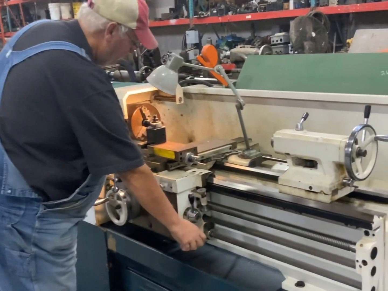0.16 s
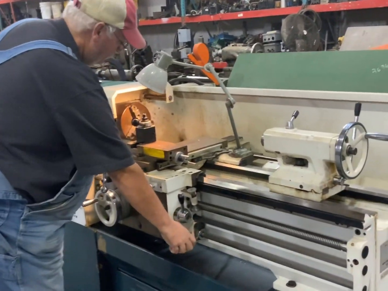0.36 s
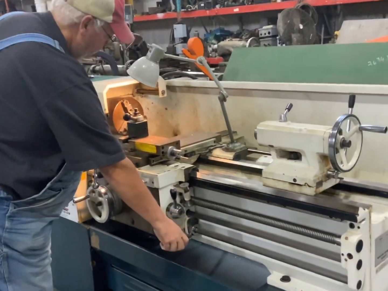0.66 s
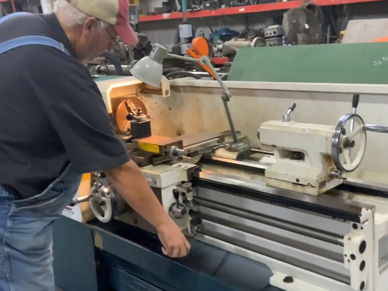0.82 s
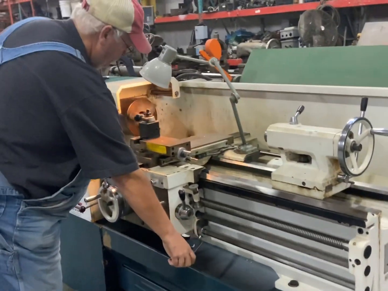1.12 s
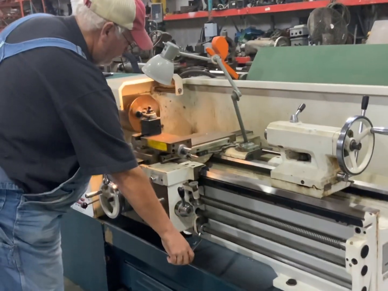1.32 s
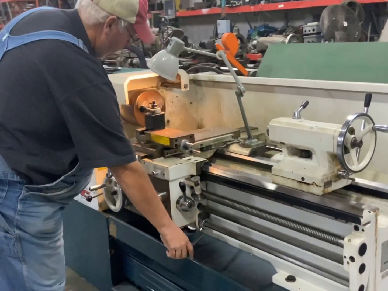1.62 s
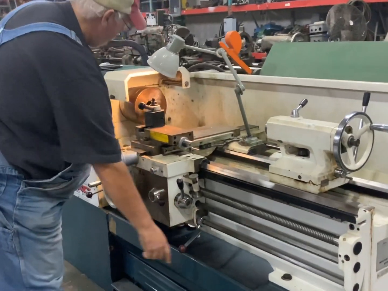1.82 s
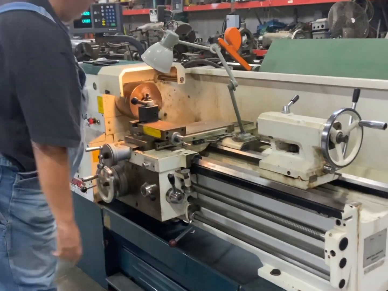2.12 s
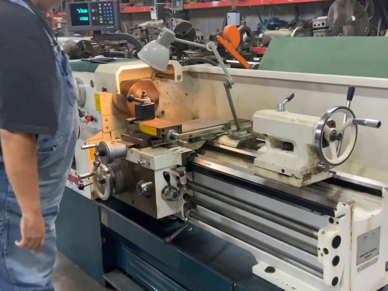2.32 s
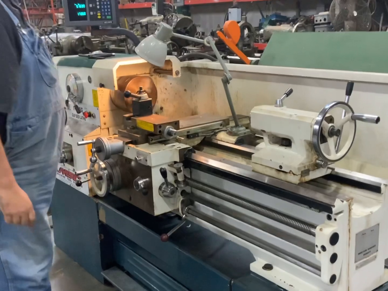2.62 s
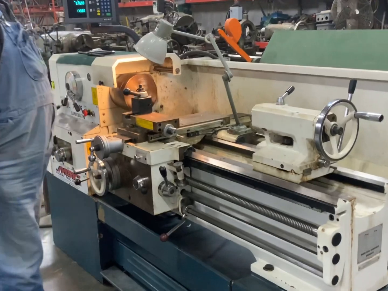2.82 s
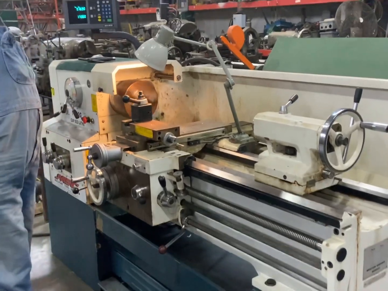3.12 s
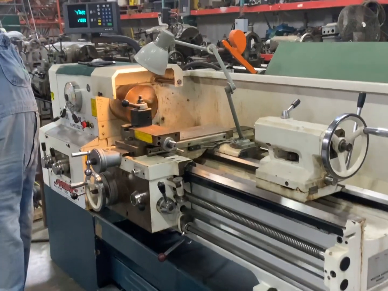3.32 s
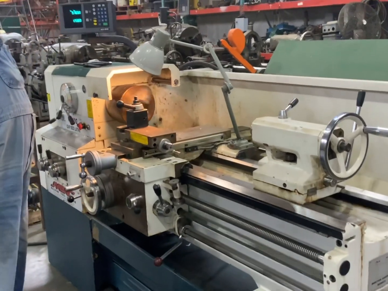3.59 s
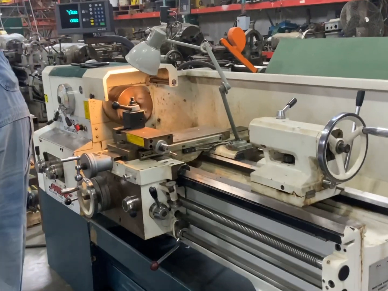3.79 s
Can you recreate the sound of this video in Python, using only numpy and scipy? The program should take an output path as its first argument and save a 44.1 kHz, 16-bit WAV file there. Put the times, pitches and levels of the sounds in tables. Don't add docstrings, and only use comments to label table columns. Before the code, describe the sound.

Metal lathe starting: faint gear hum, a sharp lever snap and heavy chattering bang, then throbbing whine.

```python
import sys
import numpy as np
from scipy import signal
from scipy.fft import rfft, irfft, next_fast_len
from scipy.io import wavfile
from scipy.ndimage import uniform_filter1d, map_coordinates

SR = 44100
rng = np.random.default_rng(int(sys.argv[2]) if len(sys.argv) > 2 else 0)


def master_out(mix):
    frames = np.transpose(np.atleast_2d(mix))
    ceiling = np.clip(frames, -1, 1)
    pcm = np.round(ceiling * 32767).astype(np.int16)
    wavfile.write(sys.argv[1], SR, pcm)


def elevation(decibels):
    levels = np.asarray(decibels, float)
    return 10 ** (levels / 20)


N = 174195
T = np.arange(N) / SR
FFT_SIZE = next_fast_len(N + SR // 2)
F = np.fft.rfftfreq(FFT_SIZE, 1 / SR)
CLUTCH_S, SPIN_UP_S = 0.895, 0.073
SPINDLE_TEETH = 58


def unit(x):
    return x / np.sqrt(np.mean(x ** 2))


def curve(table):
    hz, db = np.array(table).T
    return elevation(np.interp(np.log(F + 1), np.log(hz), db))


def colour(x, table):
    inside = (F >= table[0][0]) * (F < table[-1][0])
    return unit(irfft(rfft(x, FFT_SIZE) * curve(table) * inside, FFT_SIZE)[:N])


def noise(table):
    return colour(rng.standard_normal(N), table)


def walk(rate_hz):
    k = int(SR / rate_hz)
    steps = np.repeat(rng.standard_normal(N // k + 1), k)
    return unit(uniform_filter1d(uniform_filter1d(steps, k), k)[:N])


def ring(x, hz, width_hz):
    return signal.lfilter(*signal.iirpeak(hz, hz / width_hz, SR), x)


def resonate(x, hz, width_hz):
    return unit(ring(ring(x, hz, width_hz), hz, width_hz))


def loop(turns, hz):
    size = int(SR / hz)
    return unit(map_coordinates(rng.standard_normal(size), [turns % 1 * size], mode="grid-wrap"))


def spun():
    return 1 - np.exp(-np.clip(T - CLUTCH_S, 0, None) / SPIN_UP_S)


def teeth_meshed():
    slip = 0.017 * np.exp(-((T - 1.1) / 0.5) ** 2)
    count = np.cumsum(588.95 * (1 - slip)) / SR
    return count - count[int(2.875 * SR)]


# multiple of the tooth rate [ratio], level_db [dB]
PUMP_WHINE = [(6.93, -73), (8.09, -62), (9.024, -56.5), (9.97, -67), (12.86, -66.5), (23, -52), (24, -53.5),
              (2.994, -59), (5.01, -74), (6, -71)]
# pitch_hz [Hz], level_db [dB]
IDLE_LOW = [(30, -8), (75, -1), (150, -2.5), (205, -16), (390, -12), (520, -27), (680, -29.5),
            (1050, -26.5)]
IDLE_MID = [(1050, -16), (1330, 2.5), (1520, -11.5), (2550, -14), (3300, -10), (3720, 2), (4200, -12),
            (4650, -6)]
IDLE_TOP = [(4650, -8), (5600, 3), (7300, -5.5), (8700, -1.5), (10300, -2), (11200, -8.5), (12100, -6.5),
            (13000, -24)]
# pitch_hz [Hz], width_hz [Hz], level_db [dB]
IDLE_RINGS = [(389.2, 31, -54.5), (1344, 17, -63), (3684, 78, -60), (264, 28, -64.5), (4750, 76, -60.5),
              (5530, 210, -62.5), (6570, 380, -61)]


def idle():
    load_sag = 0.0028 * spun()
    teeth = np.cumsum(159.05 * (1 - load_sag + 0.00023 * walk(5.1))) / SR
    gears = 0.54 * loop(teeth, 159.05)
    for tooth_count in (8, 6):
        gears = gears + loop(teeth / tooth_count, 159.05 / tooth_count)
    gears = unit(gears)

    out = np.zeros(N)
    for multiple, db in PUMP_WHINE:
        out += elevation(db + 3.0 * walk(8.9)) * np.sqrt(2) * np.sin(2 * np.pi * multiple * teeth)
    # tone, level in dB, share of the power that repeats with the gears
    for body, db, share in ((IDLE_LOW, -43.5, 0.59), (IDLE_MID, -45, 0.84), (IDLE_TOP, -43.5, 0.14)):
        air = rng.standard_normal(N) * elevation(0.96 * walk(39.88))
        mix = np.sqrt(share) * gears + np.sqrt(1 - share) * air
        out += elevation(db + 0.64 * walk(11.0)) * colour(mix, body)
    for hz, width_hz, db in IDLE_RINGS:
        out += elevation(db) * resonate(air + gears, hz, 1.6 * width_hz)

    puff_db = -62 - np.clip(6 * ((T - 2.235) / 0.07) ** 6, 0, 90)
    out += elevation(puff_db) * noise([(12000, -2), (15700, -1)])
    fan = noise([(12700, 1), (13600, -3), (14300, -3), (15100, -16)])
    return out + elevation(-66.5 + 1.1 * walk(9)) * fan


# pitch_hz [Hz], level_db [dB]
RUMBLE = [(60, -24.5), (200, -5.5), (420, -3), (650, -2), (820, -9), (1250, -8.5), (2100, -11.5),
          (2700, -16)]
# pitch_hz [Hz], width_hz [Hz], level_db [dB]
CASTING = [(229, 36.5, -48), (377.4, 71, -45.5), (308, 35, -46.5), (448, 16, -51), (660, 89, -55.5),
           (873, 150, -52.5), (1058, 75, -46.5), (1223, 70, -48), (1632, 25, -55), (1873, 14, -57),
           (2290, 53, -56), (2357, 75, -49)]
# time_s [s], level_db [dB]
EFFORT = [
    (1.2, 0.5),
    (1.6, 0),
    (2.2, 0),
    (2.6, -0.5),
    (3.0, 0),
    (3.5, 1),
    (3.95, 1),
]


def rumble():
    turn = np.cos(2 * np.pi * teeth_meshed() / SPINDLE_TEETH)
    knock_db = 1.62 * rng.exponential(size=N) + 0.39 * turn + 1.02 * walk(29.93)
    knocks = rng.standard_normal(N) * elevation(knock_db)
    out = elevation(-31) * colour(knocks, RUMBLE + [(3600, -21.5), (5200, -29), (7000, -27)])
    for hz, width_hz, db in CASTING:
        out += elevation(db + 1.8 * walk(9)) * resonate(knocks, hz, 1.65 * width_hz)
    return spun() * elevation(np.interp(T, *np.array(EFFORT).T)) * out


# multiple of the tooth rate [ratio], level_db [dB], left over right pan_db [dB]
MESH = [(1, -37, -8.5), (2, -33, -3), (3, -50.5, -5), (4, -51, -6.5), (5, -52, 2), (6, -51, 0)]
# time_s [s], level_db [dB]
LOAD = [
    (1.15, -8.5),
    (1.5, -5),
    (2.0, -6),
    (2.5, -3.5),
    (3.1, -0.5),
    (3.5, -3.5),
    (3.95, -0.5),
]
RUNOUT = [
    [(58, 1, .6, -.4, .2, -2.1), (58, 4, .35, 1.1, .4, 2.8), (38, 1, .1, -.7, .55, -2.9),
     (38, 2, .1, -2, .35, -2.5)],
    [(58, 1, .76, 0, .47, -.55), (58, 2, .26, .9, .23, 1.0), (58, 4, .1, -.7, .19, -2.3),
     (38, 1, .57, .7, .3, 1.5)],
]


def mesh():
    angle = 2 * np.pi * teeth_meshed()
    throbs = []
    for gears in RUNOUT:
        throb = 1
        for teeth, bumps, depth, depth_lead, wobble, wobble_lead in gears:
            turn = angle * bumps / teeth
            throb = throb + depth * np.cos(turn + depth_lead) + 1j * wobble * np.cos(turn + wobble_lead)
        throbs.append(throb)

    out = np.zeros((2, N))
    for multiple, db, pan_db in MESH:
        tone = np.exp(1j * (multiple * angle + 0.2 * walk(16)))
        pan = np.array([[pan_db / 2], [-pan_db / 2]])
        out += elevation(db + 0.42 * walk(14) + pan) * np.imag(throbs[min(multiple, 2) - 1] * tone)
    time_s, load_db = np.array(LOAD).T
    fade_in = np.clip((T - 1.05) / 0.27, 0, 1)
    return elevation(np.interp(T, time_s, load_db) - load_db.max()) * fade_in * out


# pitch_hz [Hz], level_db [dB]
LATCH_COLOUR = [(900, -11), (3000, -7), (8000, -2), (10400, -24), (12000, -11), (15600, -19)]


def latch():
    t = np.clip(T - 0.8955, 0, None)
    fade = elevation(-30 - 60 * t / 0.21)
    return np.clip(t / 0.002, 0, 1) * fade * noise(LATCH_COLOUR)


# start_s [s], level_db [dB], brightness_db [dB]
BLOWS = [(0.895, -38, 9), (.902, -24, 12), (.912, -13.5, 2), (.918, -11, -3), (.926, -22, 9),
         (.936, -22, -2), (.945, -21.5, 5), (.953, -7, -0.5), (0.962, -20.5, -2), (0.967, -23.5, 8.5),
         (.973, -16.5, 0), (.986, -14.5, -10), (.994, -18, -7), (1.0, -20, -7), (1.009, -16.5, -4),
         (1.018, -10.5, 0.5), (1.027, -13.5, -9), (1.036, -11.5, -7), (1.045, -18.5, -7), (1.053, -15, -10),
         (1.063, -26, -13), (1.075, -21, -13), (1.087, -30, -14), (1.101, -33, -7), (1.114, -21, -8),
         (1.128, -14.5, -17), (1.14, -28, -5), (1.156, -20.5, -11), (1.18, -24, -11)]
# pitch_hz [Hz], level_db [dB], time to fall 60 dB fade_s [s]
HOUSING = [(87, -10, 0.22), (191.6, -5.5, 0.22), (318, -14, 0.12), (416, -5, .1), (435, 2, 0.084),
           (506, 1.5, 0.11), (596.7, -4.5, 0.26), (815, -9.5, 0.18), (1043, -2.5, 0.068),
           (1234, -3.5, 0.091), (1420, -9.5, 0.11), (1860, -18, 0.051), (3090, -13, 0.044),
           (3340, -21, 0.052)]
# time_s [s], level_db [dB]
SCRAPE = [
    (0.89, -54),
    (0.896, -38),
    (0.917, -13.5),
    (0.938, -33),
    (0.95, -18.5),
    (1.046, -20),
    (1.075, -33.5),
    (1.2, -32),
]
# pitch_hz [Hz], level_db [dB]
SCRAPE_COLOUR = [(60, -4), (200, -8), (480, 2.5), (1200, -7), (2500, -12.5), (5000, -22), (8000, -30),
                 (10500, -43)]


def clutch_blow(bright_db):
    t = T[:SR // 4]
    blow = np.zeros(len(t))
    for (hz, db, fade_s), chance in zip(HOUSING, rng.standard_normal(len(HOUSING))):
        tilt_db = bright_db * np.log2(max(hz, 500) / 500) / 2
        level = elevation(db + 0.96 * chance + tilt_db - 60 * t / fade_s)
        blow += level * np.sin(2 * np.pi * hz * (1 + 0.0302 * chance) * t)
    blow = blow / 3 * (1 - np.exp(-t / 0.0012))

    edge_hz = 2600 * elevation(bright_db / 2)
    crack = ring(rng.standard_normal(len(t)), edge_hz, 1.8 * edge_hz)
    crack = ring(crack, edge_hz, 1.6 * edge_hz)
    return blow + crack * elevation(-7 + bright_db - 60 * t / 0.036)


def clutch():
    out = np.zeros(N)
    for start_s, db, bright_db in BLOWS:
        out[int(start_s * SR):][:SR // 4] += elevation(db) * clutch_blow(bright_db)
    out = signal.lfilter(*signal.butter(4, 8500, fs=SR), out)

    time_s, scrape_db = np.array(SCRAPE).T
    fade_in = np.clip((T - time_s[0]) / 0.016, 0, 1)
    fade_out = np.clip((1.25 - T) / 0.21, 0, 1)
    scrape = elevation(-3 + np.interp(T, time_s, scrape_db)) * fade_in * fade_out
    return out + scrape * noise(SCRAPE_COLOUR)


# pitch_hz [Hz], level_db [dB]
DIFFUSE = [(60, -33), (250, -16), (750, 2.5), (1400, -7.5), (2550, -6.5), (3800, -14.5), (7500, 0),
           (9800, -34), (12000, 1), (13200, -22)]


def shop(x, fade_s):
    t = T[:SR // 2]
    tails = rng.standard_normal((2, len(t))) * elevation(-60 * t / fade_s) * (t > 0.003)
    tails = tails / np.sqrt(np.sum(tails ** 2, axis=1, keepdims=True))
    echo = curve(DIFFUSE)
    path = (1 + rfft(tails, FFT_SIZE) * echo) / np.sqrt(1 + echo ** 2)
    return irfft(rfft(x, FFT_SIZE) * path, FFT_SIZE)[:, :N]


def scene():
    steady = shop(idle() + rumble(), 0.9)
    start = shop(clutch() + latch(), 0.25)
    return steady + start + mesh()


def roll_off(x):
    return signal.sosfilt(signal.butter(12, 15810, fs=SR, output="sos"), x)


# pitch_hz [Hz], left leads by [rad]
PORT_PHASE = [(0, 0), (340, 0.4), (690, 1.62), (2070, -1.77), (2570, -3), (2930, -4.5), (3530, -7),
              (4480, -5), (5250, -7.5), (6550, -7), (9040, -9), (10900, -10), (12200, -10.5),
              (12700, -17.5), (15400, -13)]
# pitch_hz [Hz], left over right level_db [dB]
PORT_PAN = [(100, 0), (400, -1), (750, 5), (1200, -4), (2000, -0.2), (2570, -.1), (3300, -1.5), (6000, -.5),
            (15000, 0.5)]


def record(dry):
    side = np.array([[0.5], [-0.5]])
    lead = np.interp(F, *np.array(PORT_PHASE).T)
    ports = np.exp(1j * side * lead) * curve(PORT_PAN) ** side
    squeezed = 1.9 * np.tanh(dry / 1.9)
    treble_cut = np.clip((15800 - F) / 300, 0, 1)
    bass_cut = 1 / np.sqrt(1 + (55 / (F + 1)) ** 8)
    heard = rfft(squeezed, FFT_SIZE) * ports * treble_cut * bass_cut
    heard = np.where(F > 12800, heard[0], heard)
    return roll_off(irfft(heard, FFT_SIZE)[:, :N])


dry = scene()
out = record(dry)
master_out(out)
```